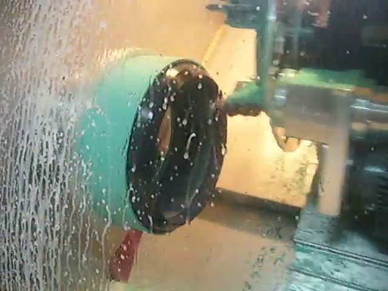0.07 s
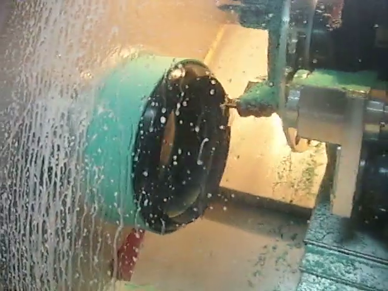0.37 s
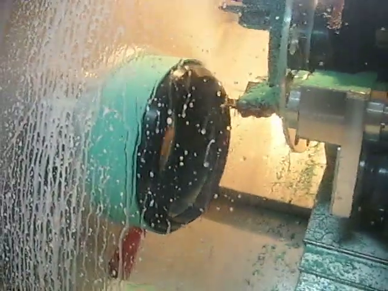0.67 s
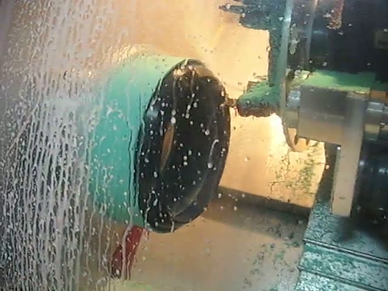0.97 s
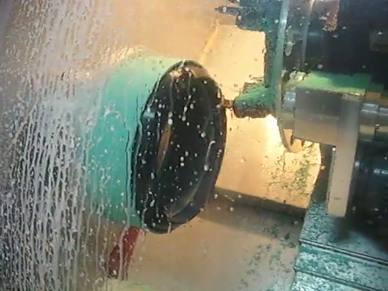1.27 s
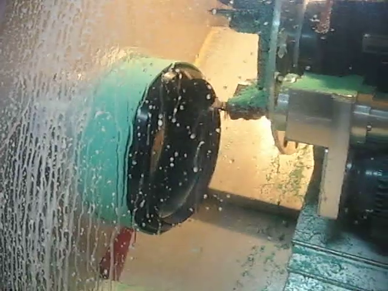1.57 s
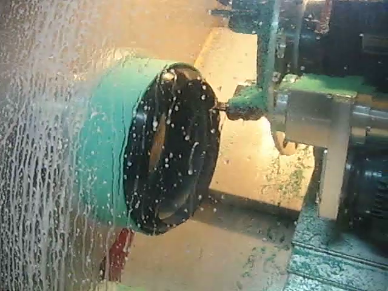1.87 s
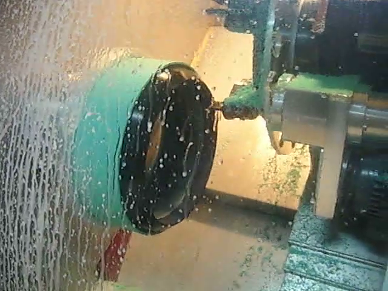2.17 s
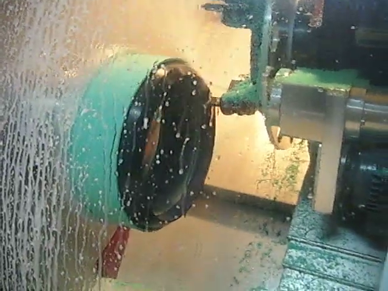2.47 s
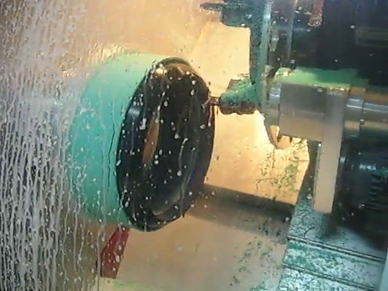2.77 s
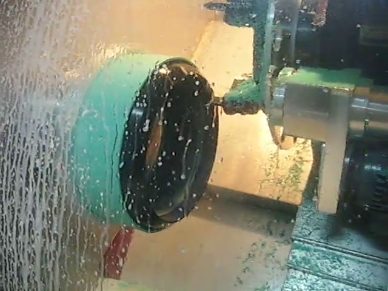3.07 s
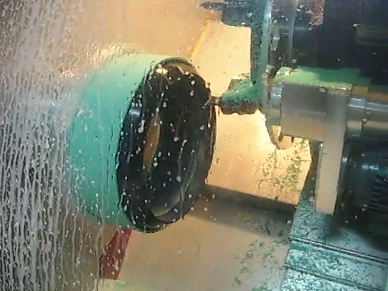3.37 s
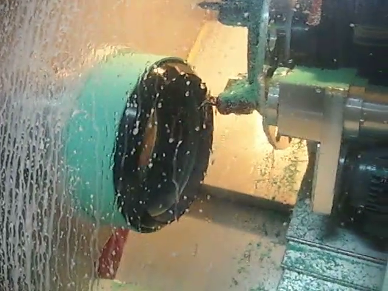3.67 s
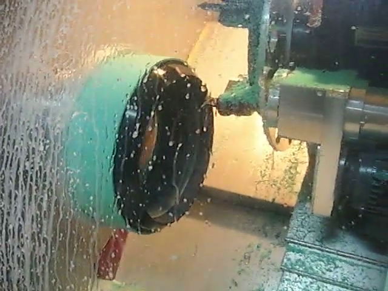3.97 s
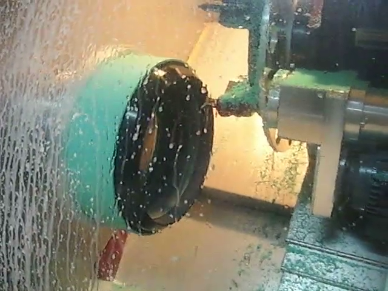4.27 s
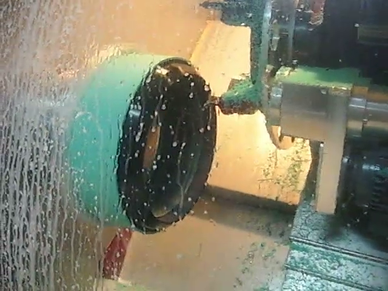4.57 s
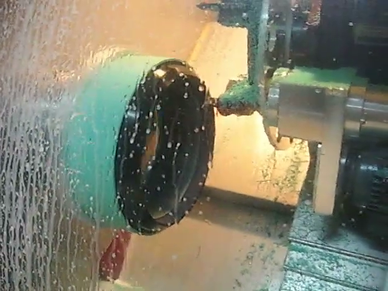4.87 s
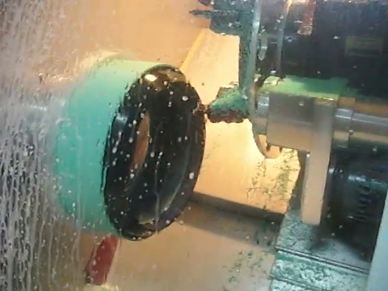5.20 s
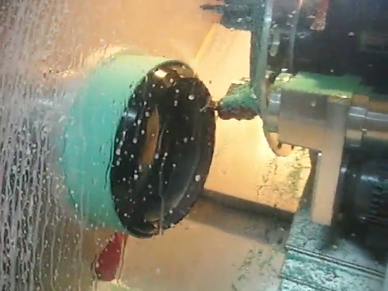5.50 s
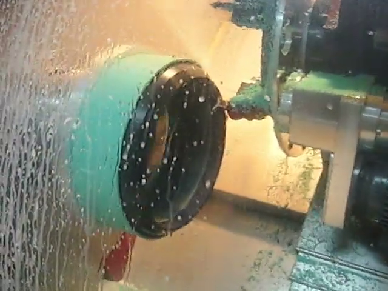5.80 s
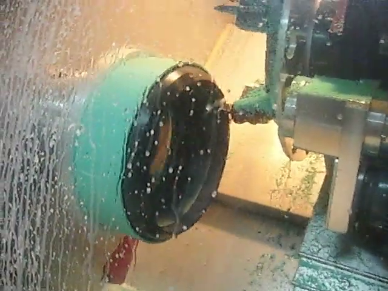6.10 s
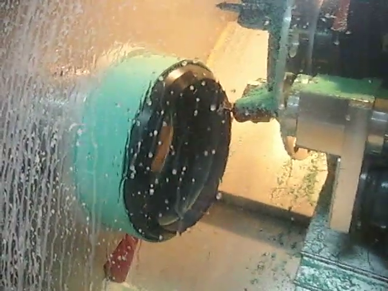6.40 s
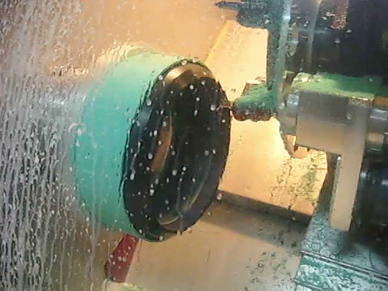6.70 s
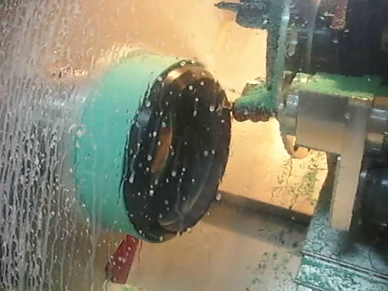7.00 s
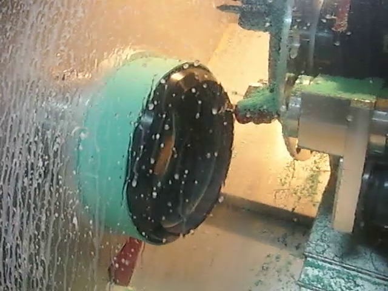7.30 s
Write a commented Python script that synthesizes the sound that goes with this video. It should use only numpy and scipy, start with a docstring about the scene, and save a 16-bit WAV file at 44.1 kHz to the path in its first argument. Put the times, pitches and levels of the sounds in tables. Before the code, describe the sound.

A machine lathe runs steadily with a heavy, restless drone, coolant spray hissing inside its enclosure and a faint whine.

```python
"""At the enclosure window of a CNC lathe, running steadily under flood coolant.
Coolant pours on the turning chuck and drums on the cabinet, whose narrow resonances make a heavy,
restless drone. Spray hisses over it, the pump shaft hums and the drives whine.
The microphone is narrow-band, and the loudest peaks clip."""
import sys
import numpy as np
from scipy import signal
from scipy.fft import rfft, irfft, next_fast_len
from scipy.io import wavfile
from scipy.ndimage import map_coordinates

SR = 44100
rng = np.random.default_rng(int(sys.argv[2]) if len(sys.argv) > 2 else 0)


def unload_wav(signal):
    """Save mono or channel-first audio to the path in sys.argv[1] as 16-bit WAV at rate SR, clipped to [-1, 1]."""
    wavfile.write(
        sys.argv[1],
        SR,
        np.round(np.clip(np.atleast_2d(signal).T, -1, 1) * 32767).astype(np.int16),
    )


N = 328545
TIME = np.arange(N) / SR

# the cabinet's narrow resonances: centre_hz, width_hz, relative_db
CABINET_MODES = [(51.3, 16, -11.5), (77.3, 13, -11.5), (138, 8, -9.5), (156.4, 7, -7.5), (167.8, 8, -2.5),
                 (192, 10, -4), (207, 10, -4), (221, 6.4, -10), (239.5, 8, -7.5), (257.9, 14, -3),
                 (278, 7, 0.3), (299.6, 14, -12), (352.5, 8, -10.5), (372.5, 5.1, -12), (456, 11, -6),
                 (469.4, 14, -4.5), (481.2, 9, -3.5), (497, 12.7, -0.5), (510, 10, -8), (531, 7, -5.5),
                 (547, 28, -9), (578.6, 9.2, -7), (595.6, 4.9, -8.8), (638.5, 18, -12), (692, 6.4, -15.5),
                 (737, 8, -11), (766, 49, -17.5), (900, 11, -18.5), (1257, 8, -16)]
# the broad rush between them, on the same scale: frequency_hz, relative_db
RUSH_SPECTRUM = [(8, -24), (22, -32), (38, -32.5), (60, -24.5), (120, -15), (180, -20.5), (430, -14),
                 (610, -18.5), (700, -18), (830, -20.5), (1200, -22.5), (1320, -24.5), (1550, -33.5),
                 (2200, -73.5)]
# crossovers between rumble, boom, body, ring and wash: edge_hz
BAND_EDGES = [125, 232, 400, 620]
# the drone's three bands, boom, body and ring: base_db, unrest_db, unrest_per_s
DRONE_BANDS = [(-20.5, 1.3, 12), (-18.9, 1.3, 13), (-16.4, 1.3, 9)]
# the drone's slow level trend: time_s, gain_db
DRONE_TREND = [(0, -.6), (.6, -.8), (1.2, 0), (2.5, -.3), (3.25, -.8), (3.9, .2), (5, .1), (6.3, 1.3),
               (6.85, .9), (7.25, -.3)]
# the strongest swells and their lift in each band: peak_s, boom_db, body_db, ring_db
DRONE_SWELLS = [(0.31, 3, 2, 1.5), (0.96, 0.5, 1.4, 3.5), (1.13, 3.4, 2.5, 1.4), (1.36, 0.3, -0.3, 3),
                (1.97, 4, 0.5, 1.5), (2.53, 3.5, 1.5, 2), (2.9, 1.5, 3, 1), (3.66, 2, 2.5, 2),
                (4.29, 3, 4.5, 1), (4.89, 3.5, 0.3, 3), (5.23, 0.6, 1.7, 2.5), (5.76, 3, 2, 1.3),
                (6.08, 4, 3, 1), (6.21, -0.3, -0.5, 2.5), (6.8, 5, 0.5, 1), (6.93, -0.2, 4, 2.5)]
# tone colour of the spray behind the window: frequency_hz, relative_db
SPRAY_SPECTRUM = [(900, -31), (1400, -12), (1720, -9), (2000, -4), (2350, -1.1), (2620, 1), (2900, -3),
                  (3350, -7.5), (4150, -8.5), (4600, -4), (4950, -8.5), (5500, -15), (5750, -23.5),
                  (6300, -53.5)]
# the spray's level ride: time_s, level_db
SPRAY_LEVEL = [(0, -23), (0.8, -22), (1.8, -23), (2.2, -22.3), (2.8, -23), (5, -23), (7.45, -23)]
# wall resonances overlap and smooth out towards the treble: frequency_hz, ripple_factor
SPRAY_RIPPLE = [(2600, 0.97), (4500, 0.46)]
# the pump's hum: shaft_order, level_db
PUMP_ORDERS = [(1, -36), (2, -29.5), (3, -34)]
# the three main drive whines: pitch_hz
DRIVE_PITCHES = [1024.1, 1075.3, 1124.1]
# the same three whines: level_db
DRIVE_LEVELS = [-34.8, -34.7, -33.5]
# faint whines above them: pitch_hz, level_db
UPPER_WHINES = [(2087, -49.5), (2132, -48), (2320, -49), (2440, -47), (2624, -44.5)]


def cabinet(rumble_db=-27.5, wash_db=-22, wash_unrest_db=0.4):
    """The flooded cabinet: a restless drone between a steady rumble and an almost even wash."""
    rumble = amp(rumble_db) * cabinet_band(0, BAND_EDGES[0])
    wash_gain = amp(wash_db + wash_unrest_db * wobble(6))
    wash = wash_gain * ride_level(cabinet_band(BAND_EDGES[-1], SR / 2), window_samples=22000)
    return drone() + rumble + wash


def drone(swell_width_s=.055):
    """The cabinet's drone: each band follows a slow level trend, wavers at random and swells at times."""
    trend_db = envelope(DRONE_TREND)
    lifts_db = sum(np.outer(heights_db, np.exp(-((TIME - peak_s) / swell_width_s) ** 2))
                   for peak_s, *heights_db in DRONE_SWELLS)
    bands = zip(DRONE_BANDS, lifts_db, BAND_EDGES, BAND_EDGES[1:])
    out = np.zeros(N)
    for (base_db, unrest_db, unrest_per_s), lift_db, low_hz, high_hz in bands:
        level_db = base_db + trend_db + unrest_db * wobble(unrest_per_s) + lift_db
        out += amp(level_db) * ride_level(cabinet_band(low_hz, high_hz), window_samples=10000)
    return out


def cabinet_band(low_hz, high_hz):
    """Turbulence rings the cabinet's resonances between two frequencies."""
    return noise(lambda hz: cabinet_response(hz) * (hz >= low_hz) * (hz < high_hz))


def cabinet_response(hz, ripple_db=2):
    """Steep resonances stand on a broad, rippled rush; their powers add."""
    mode_power = 0
    for centre_hz, width_hz, db in CABINET_MODES:
        detuning = (hz ** 2 - centre_hz ** 2) / ((hz + 1e-3) * width_hz)
        mode_power += (amp(db) / (1 + detuning ** 2)) ** 2
    rush = amp(along(RUSH_SPECTRUM, hz) + ripple_db * wall_ripple(hz, step_hz=6))
    return np.sqrt(mode_power + rush ** 2)


def spray(trim_db=-0.01, ripple_db=2.5, flutter_db=0.2):
    """Countless droplets merge into a hiss, coloured by the close-set resonances of the steel walls."""
    def colour(hz):
        walls_db = ripple_db * wall_ripple(hz, step_hz=9) * along(SPRAY_RIPPLE, hz)
        return amp(along(SPRAY_SPECTRUM, hz) + walls_db)
    hiss = noise(colour)
    return amp(envelope(SPRAY_LEVEL) + trim_db + flutter_db * wobble(18)) * hiss


def pump_hum(shaft_hz=31.02):
    """The pump hums at multiples of its shaft speed."""
    return sum(tone(order * shaft_hz, db, drift_hz=0.054, waver_db=0.5) for order, db in PUMP_ORDERS)


def drive_whine(sway_db=1.3, sway_per_s=1.6):
    """The drives sing three tones that sway slowly in level, with fainter whines on top."""
    main = sum(tone(hz, db + sway_db * wobble(sway_per_s), drift_hz=.3, waver_db=1.5)
               for hz, db in zip(DRIVE_PITCHES, DRIVE_LEVELS))
    upper = sum(tone(hz, db, drift_hz=0.99, waver_db=3.0) for hz, db in UPPER_WHINES)
    return main + upper


def tone(hz, rms_db, drift_hz, waver_db):
    """A machine tone whose pitch and level wander a little."""
    turns = np.cumsum(hz + drift_hz * wobble(3.04)) / SR + rng.random()
    return np.sqrt(2) * amp(rms_db + waver_db * wobble(5)) * np.sin(2 * np.pi * turns)


def wall_ripple(hz, step_hz):
    """Close-set wall resonances: a random ripple over frequency, one knot every step_hz."""
    return np.interp(hz / step_hz, np.arange(2000), rng.standard_normal(2000))


def noise(response):
    """A steady noise bed of rms 1 with the given spectrum."""
    size = next_fast_len(N)
    hz = np.fft.rfftfreq(size, 1 / SR)
    spectrum = response(hz) * np.exp(2j * np.pi * rng.random(len(hz)))
    bed = irfft(spectrum, size)[:N]
    return bed / np.sqrt(np.mean(bed ** 2) + 1e-20)


def ride_level(x, window_samples):
    """Holds the slow level at rms 1 and lets the faster beating through."""
    window = np.hanning(window_samples)
    smooth = lambda v: signal.fftconvolve(v, window, 'same')
    return x / np.sqrt(np.abs(smooth(x ** 2)) / smooth(np.ones(N)) + 1e-12)


def wobble(knots_per_s):
    """Smooth random modulation."""
    knots = rng.standard_normal(int(N * knots_per_s / SR) + 4)
    return map_coordinates(knots, [TIME * knots_per_s])


def envelope(points):
    """Straight ramps through (time_s, value) points."""
    return np.interp(TIME, *np.transpose(points))


def along(points, hz):
    """Reads (frequency_hz, value) points on a log frequency axis."""
    knots_hz, values = np.transpose(points)
    return np.interp(np.log(hz + 1), np.log(knots_hz + 1), values)


def amp(db):
    """Decibels to gain."""
    return 10 ** (np.asarray(db) / 20)


def brickwall(x, cutoff_hz):
    """Cuts everything above cutoff_hz."""
    size = next_fast_len(N + SR // 2)
    passband = np.fft.rfftfreq(size, 1 / SR) < cutoff_hz
    return irfft(rfft(x, size) * passband, size)[:N]


def scene():
    """The whole machine in mono."""
    return (cabinet() + spray() + pump_hum() + drive_whine())[None]


def record(dry, gain_db=0.24, overload=.745, knee=16, ceiling=.708):
    """A narrow-band input squashes the top peaks; its filter overshoots and the next stage clips."""
    hot = amp(gain_db) * dry[0]
    squashed = hot / (1 + np.abs(hot / overload) ** knee) ** (1 / knee)  # higher knee, harder corner
    narrow = brickwall(squashed, cutoff_hz=6200)
    clipped = np.clip(narrow, -ceiling, ceiling)
    return brickwall(clipped, cutoff_hz=15870)[None]


dry = scene()
out = record(dry)
unload_wav(out)
```